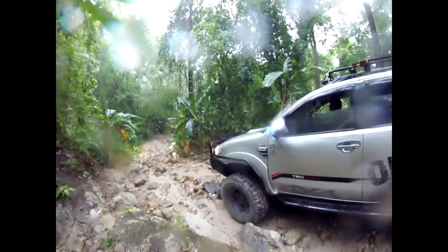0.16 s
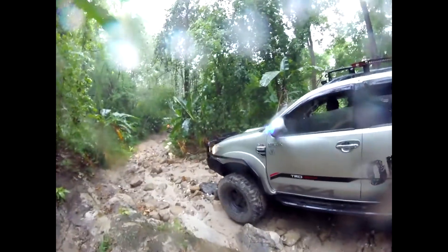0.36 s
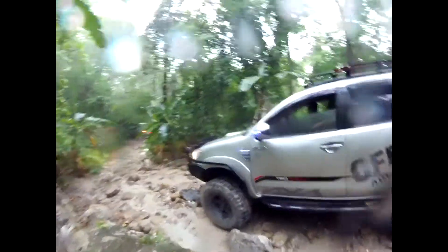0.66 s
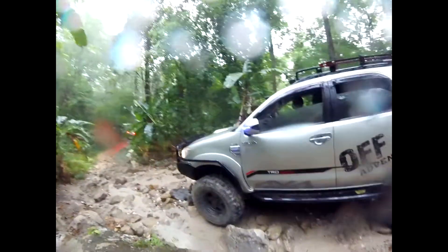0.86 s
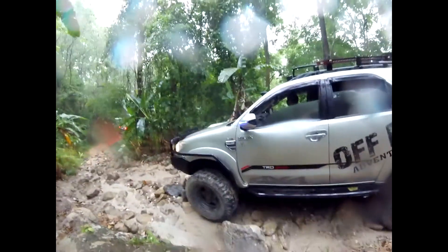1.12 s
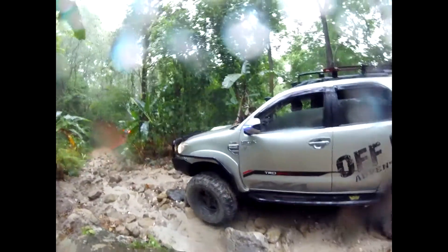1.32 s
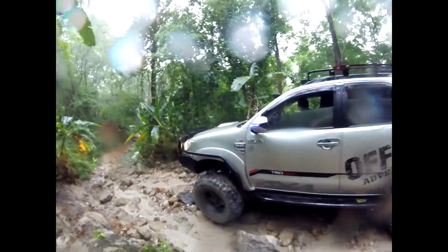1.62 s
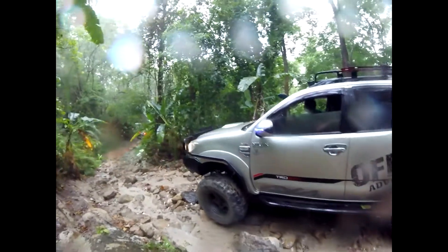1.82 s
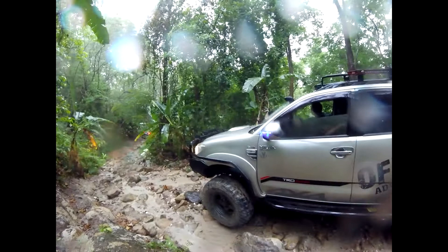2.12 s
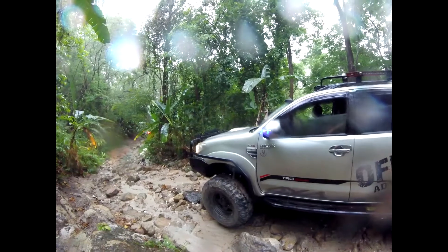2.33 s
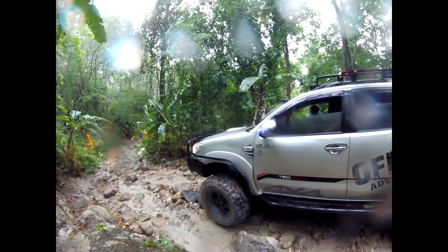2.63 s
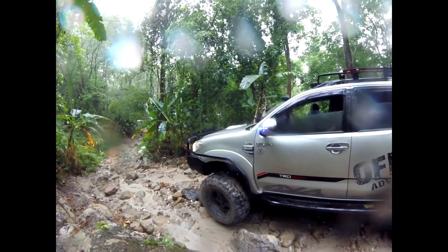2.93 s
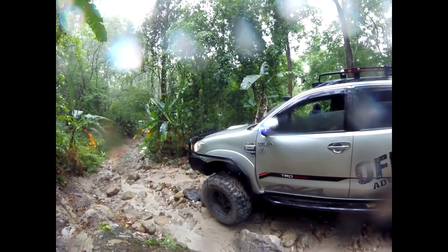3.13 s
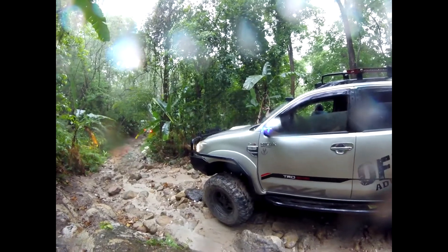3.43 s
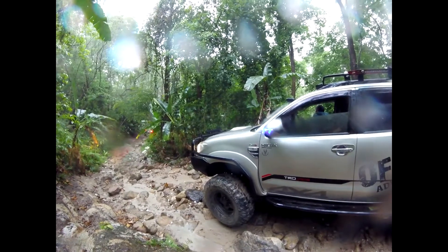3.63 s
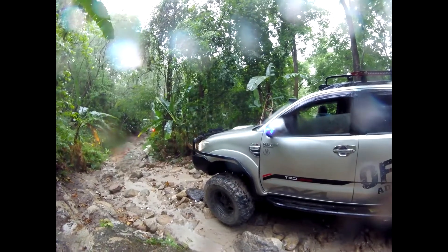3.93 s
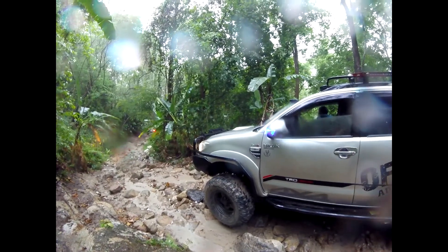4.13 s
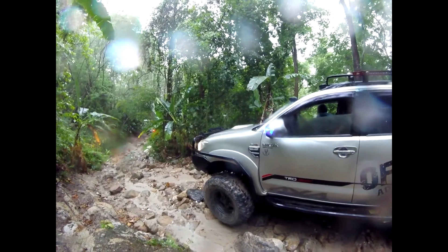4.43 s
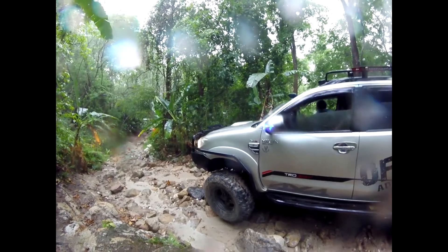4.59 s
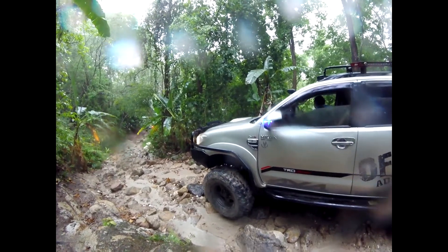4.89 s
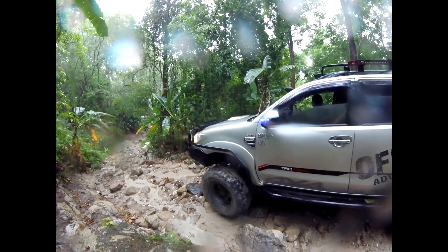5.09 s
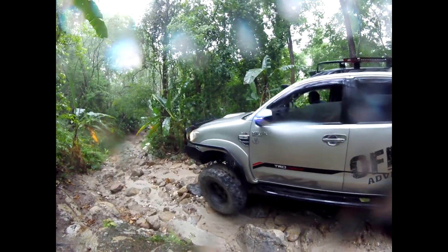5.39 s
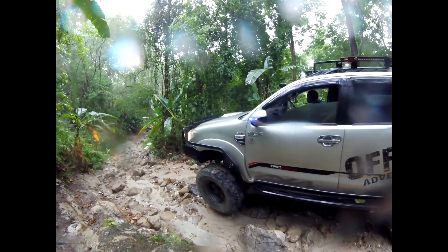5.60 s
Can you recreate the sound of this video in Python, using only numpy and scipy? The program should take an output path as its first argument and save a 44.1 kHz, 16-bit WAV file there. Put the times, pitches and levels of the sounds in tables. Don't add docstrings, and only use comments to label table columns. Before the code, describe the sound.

A diesel four-wheel drive works over wet rocks in forest rain, heard in mono by a small camera close by. From 0 to 1.3 s the low chug, about 25 pulses a second, sits with clear rain hiss, soft low chassis booms and small ticking drops on the case. From 1.3 to 2 s water closes over the microphone and the treble dulls; very faint high brake squeal flickers near 1.7 s and a short creak at 1.86 s. A deep drop thud lands at 1.95 s, the background ducking just before and climbing back. The muffled engine drones on, revving at about 3.4-3.8 s, then sagging. A sharp, hard smack at 3.99 s causes a deeper duck, recovering over more than a second. At about 4.9 s the water film bursts: bright hiss and a faint wet whistle return, and the engine surges with fan rush around 5.35 s, then eases.

```python
import sys
import numpy as np
from scipy import signal
from scipy.fft import rfft, irfft, next_fast_len
from scipy.io import wavfile
from scipy.ndimage import uniform_filter1d, minimum_filter1d, map_coordinates

SR = 44100
rng = np.random.default_rng(int(sys.argv[2]) if len(sys.argv) > 2 else 0)


def generate_wav(signal):
    frames = np.transpose(np.atleast_2d(signal))
    scaled = np.clip(frames, -1, 1) * 32767
    pcm = np.round(scaled).astype(np.int16)
    wavfile.write(sys.argv[1], SR, pcm)


def decibels_to_gain(level_db):
    exponent = np.asarray(level_db, float) / 20
    return 10 ** exponent


N = 253575

# time in seconds, firings per second, share of clean exhaust tone 0-1.
SPEED = [(0, 25, .3), (1.2, 24.7, .3), (2, 24, .45), (3.2, 23.7, .55), (3.45, 28.5, .8), (3.65, 31.5, .8),
         (3.87, 28.5, .8), (4.2, 19, .6), (5.05, 23, .75), (5.35, 33, .86), (5.5, 32, .82), (5.75, 28, .75)]
THUD = 1.95175, -52, [(1123, -18, 0.022), (1700, -12, .012), (2030, -3.5, 0.007), (4360, -29, .003)]
SMACK = 3.9909, -7, [(302, -24.5, 0.033), (1010, -32, 0.023), (1790, -1.5, 0.0096), (2120, -29, .012),
         (2920, -23, 0.0099), (4100, -7, 0.0026), (4780, -8, 0.006)]
OPEN_DB, FILMED_DB = -11.5, -25
FILM_BURST_S = 4.865


def unit(x):
    return x / np.sqrt(np.mean(x ** 2) + 1e-20)


def curves(rows):
    s, *cols = np.transpose(rows)
    return [np.interp(np.arange(N) / SR, s, c) for c in cols]


def wobble(rate):
    knots = rng.standard_normal(int(N * rate / SR) + 4)
    return map_coordinates(knots, [np.arange(N) * rate / SR])


def coloured(x, points, rings=()):
    m = next_fast_len(N + 8192)
    f = np.fft.rfftfreq(m, 1 / SR)
    hz, db = np.transpose(points)
    slope_db = np.interp(np.log(f + 1), np.log(hz + 1), db)
    bumps_db = sum(lift / (1 + (2 * (f - c) / w) ** 2) for c, w, lift in rings)
    return unit(irfft(rfft(x, m) * decibels_to_gain(slope_db + bumps_db), m)[:N])


def patchy(depth_db):
    z = signal.stft(rng.standard_normal(N + 512), nperseg=512)[2]
    field = uniform_filter1d(rng.standard_normal(z.shape), size=6, axis=0)
    field = uniform_filter1d(field, size=10, axis=1)
    return signal.istft(z * decibels_to_gain(depth_db * unit(field)), nperseg=512)[1][:N]


def ring(s, modes, attack):
    out, t = np.zeros(N + SR), np.arange(2000) / SR
    sway = np.zeros(len(t))
    for k, (hz, db, t60) in enumerate(modes):
        sway += (-1) ** k * decibels_to_gain(db - 60 * t / t60) * np.sin(2 * np.pi * hz * t)
    out[round(s * SR):][:len(t)] = sway * (1 - np.exp(-t / attack))
    return out[:N]


def glide(rows, octave=0, waver=0):
    out, t = np.zeros(N), np.arange(N) / SR
    for s, length, hz0, hz1, db in rows:
        u = np.clip((t - s) / length, 0, 1)
        phase = 2 * np.pi * length * u * (hz0 + (hz1 - hz0) * u / 2) + waver
        out += decibels_to_gain(db) * np.abs(np.sin(np.pi * u)) * (np.sin(phase) + octave * np.sin(2 * phase))
    return out


def camera():
    # time in seconds, mid level in dB.
    nearness = [(0, -36.5), (.35, -36), (.65, -35.5), (.85, -34.5), (1.2, -33), (1.6, -37), (1.8, -40.5),
                (1.87, -39), (2, -39), (4.8, -40), (5.0, -38), (5.3, -35), (5.5, -37), (5.75, -41)]
    look_ahead = [
        .0515,
        .0428,
    ]
    # gain after the duck in dB, climb per second as share of full gain.
    ducks = [
        (-12.5, 0.32),
        (-27, 0.61),
    ]
    film_starts_s, film_closing_s, burst_decay_s = 1.28, 0.78, .09
    duck_s = .0012
    brighter = 0.36
    t = np.arange(N) / SR
    gain = np.ones(N)
    for hit, ahead, (duck_db, climb) in zip((THUD[0], SMACK[0]), look_ahead, ducks):
        since = t - hit + ahead
        recovering = np.minimum(1, decibels_to_gain(duck_db) + climb * np.maximum(since - ahead, 0))
        gain = np.where(since > 0, recovering, gain)
    gain = uniform_filter1d(gain, size=round(duck_s * SR) + 1)
    closing = np.clip((t - film_starts_s) / film_closing_s, 0, 1)
    film = closing * np.exp(-np.maximum(t - FILM_BURST_S, 0) / burst_decay_s)
    near_db = curves(nearness)[0]
    clear_db = OPEN_DB + brighter * (near_db - near_db.max() + 2)
    return gain * decibels_to_gain(near_db), clear_db + (FILMED_DB - clear_db) * film


def engine():
    # frequency in Hz, level in dB.
    pipe = [(11, -42), (18, -7.5), (59, 6.5), (114, -5), (162, -14.5), (200, -9.5), (260, -23), (440, -120)]
    # frequency in Hz, level in dB.
    panels = [(65, -30.5), (110, -2.5), (312, -4.5), (455, -18.5), (524, -10.5), (600, -28.5), (780, -43),
              (1320, -120)]
    # time in seconds, exhaust load in dB, body strain in dB.
    load = [(0, 2, -0.5), (.6, 5, 1), (.85, 6.5, 3.5), (1.3, 3, 2), (1.8, 11.5, 4), (2.05, 11.5, 1),
            (2.7, 6, -2), (3.4, 9.5, -1), (3.8, 5, 0), (4.5, 0.5, 1.1), (5.1, 3.5, 1.5), (5.75, 1, -0.5)]
    orders_db = [0, -3.5, -5.5, -15, -12]
    firings_per_s, steady = curves(SPEED)
    exhaust_db, boom_db = curves(load)
    turns = np.cumsum(firings_per_s * (1 + .004 * wobble(12))) / SR
    fired = np.diff(np.floor(turns), prepend=0) > 0
    cylinder_db = np.array([0, -2.5, 1, -1.5])[np.floor(turns).astype(int) % 4]
    pulses = fired * decibels_to_gain(cylinder_db + 0.88 * rng.standard_normal(N))

    tones = np.zeros(N)
    for k, db in enumerate(orders_db, 2):
        level = decibels_to_gain(db + 1.3 * wobble(6))
        tones += level * np.cos(2 * np.pi * k * turns + k * k / 2 + .5 * wobble(9))
    turbulence = decibels_to_gain(2.1 * wobble(14)) * patchy(1.0)
    rumble = 0.23 * coloured(pulses, pipe) + 1.09 * coloured(turbulence, pipe)
    exhaust = steady * unit(tones) + np.sqrt(1 - steady ** 2) * rumble

    shaking = decibels_to_gain(1.46 * wobble(18)) * patchy(0.75)
    boom = .5 * steady ** 2 * coloured(pulses, panels) + 0.95 * coloured(shaking, panels)
    knock = np.exp(-3.5 * (turns % 1)) * decibels_to_gain(4.4 * wobble(22.06))
    return decibels_to_gain(exhaust_db) * exhaust + decibels_to_gain(boom_db - 0.3) * boom, knock


def spatter(rate, spread_db):
    landed = rng.random(N) < rate / SR
    return unit(landed * rng.standard_normal(N) * decibels_to_gain(spread_db * rng.exponential(size=N)))


def rain_and_rattle(treble_db, knock):
    # frequency in Hz, level in dB.
    open_port = [(210, -40.5), (350, -2.5), (750, -2), (1030, -3.5), (1910, -6.5), (3600, -10),
                 (4200, -24.5), (6000, -24), (9600, -24.5), (10050, -46), (11000, -53.5), (11500, -55),
                 (14500, -52.5), (15200, -88)]
    filmed_port = [(210, -42), (350, -7), (600, -2), (1210, -3), (2100, -10), (3780, -26.5), (6000, -37),
                   (11500, -45), (14000, -55.5), (15200, -82)]
    # centre in Hz, width in Hz, lift in dB.
    open_rings = [(534, 22, 3.5), (736, 75, 3.5), (1184, 45, 4), (3090, 1050, 6.5), (5370, 620, 11.5),
                  (6580, 230, 9), (9080, 980, 4.5), (10600, 500, 6.5), (12750, 900, 16)]
    film_rings = [(1040, 61, 2), (1682, 250, 10), (4800, 440, 8)]
    clear = np.sqrt(np.clip(decibels_to_gain(treble_db + 10.5) ** 2 - decibels_to_gain(-16.0) ** 2, 0, 2))
    film = np.sqrt(1 - np.clip(1.134 * clear, 0, .97) ** 2)

    def source():
        hiss = patchy(1.5) * (1 + 0.43 * knock) * decibels_to_gain(0.59 * wobble(7.8))
        return hiss + 0.28 * spatter(2500, spread_db=0.3)

    through_clear = decibels_to_gain(2.5) * clear * coloured(source(), open_port, open_rings)
    through_film = decibels_to_gain(1.0) * film * coloured(source(), filmed_port, film_rings)
    return through_clear + through_film


def fan_rush(treble_db, knock):
    # frequency in Hz, level in dB.
    fan_band = [(1500, -120), (2200, -40), (2750, -3), (3350, 2.5), (3750, -4.5), (4200, -42.5),
                (5500, -120)]
    octaves = np.log2(curves(SPEED)[0] / 32)
    level = decibels_to_gain(-4.5 + 23 * octaves)
    return decibels_to_gain(treble_db - OPEN_DB) ** 2 * level * (1 + .3 * knock) * coloured(patchy(2.2), fan_band)


def chassis_lurches():
    # start in seconds, length in seconds, pitch in Hz, level in dB.
    lurches = [(0.063, 0.061, 52, -23.5), (0.428, .08, 67, -19.5), (0.599, .06, 60.6, -23),
               (.86, 0.11, 44, -23.5), (1.03, 0.031, 50, -14.5), (1.066, 0.052, 56, -12),
               (1.142, 0.054, 52.5, -15.5), (1.321, 0.068, 58, -19.5), (1.423, 0.059, 65, -22),
               (1.671, 0.078, 69.7, -25.5), (1.781, .05, 40, -24.5), (1.834, 0.048, 62.6, -23.5)]
    sag = 0.91
    return glide([(s, length, hz, hz * sag, db) for s, length, hz, db in lurches])


def small_drops():
    # time in seconds, peak in dB, ring in Hz, case body in dB, bright crack in dB.
    ticks = [(0.116, -19.5, 1700, -11, -21), (0.129, -18.5, 3130, -11, -10.5),
             (0.3955, -17.5, 2050, -7, -20), (0.7042, -11.5, 1700, -25, -36), (0.8614, -40, 3320, -6, -17),
             (0.9297, -15, 1360, -24, -36), (1.072, -12, 3220, -14, -20), (1.3787, -23, 3240, -10, -24),
             (1.494, -23, 1570, -9, -14.5), (1.592, -21, 1550, -26, -40), (1.7, -33, 1740, -15, -15),
             (1.8424, -36, 1800, -18, -13), (2.401, -20.5, 1770, -36, -46), (3.6928, -21.5, 1770, -12, -34),
             (4.0644, -52, 1650, -24, -20), (4.228, -27, 1750, -14.5, -45), (4.5394, -52, 1640, -16, -31),
             (5.083, -20.5, 1680, -26, -36), (5.1862, -13, 1640, -25, -33), (5.3114, -26, 3360, -18, -11)]
    out = np.zeros(N)
    for s, db, hz, body_db, crack_db in ticks:
        main = [(hz, db - 4.5, .011), (.68 * hz, db - 12, .008)]
        body = [(pitch, db + body_db - 0.5, .005) for pitch in (2340, 2950, 4070, 4800)]
        crack = [(pitch, db + crack_db + 7.5, .006) for pitch in (5450, 6500)]
        out += ring(s, main + body + crack, attack=.0004)
    return out


def brake_squeal():
    # start in seconds, length in seconds, start in Hz, end in Hz, level in dB.
    slips = [
        (1.617, .03, 4470, 4620, -56),
        (1.649, .012, 4620, 4520, -58),
        (1.657, .05, 4490, 4445, -56),
        (1.712, .055, 4430, 4540, -54),
        (1.762, .03, 4530, 4530, -68),
    ]
    waver = 2 * np.pi * np.cumsum(12 * wobble(90)) / SR
    return decibels_to_gain(1.5 * wobble(60)) * glide(slips, octave=1, waver=waver)


def creaks():
    # start in seconds, length in seconds, start in Hz, end in Hz, level in dB.
    creak_rows = [
        (1.858, .033, 1680, 1950, -33),
        (1.86, .025, 1350, 1340, -36),
        (1.643, .016, 4900, 5000, -53),
        (4.0, .05, 5250, 5250, -76),
    ]
    return glide(creak_rows)


def big_drops():
    push = 1.95135, [(250, 8.5, .0135), (560, -3, .006)], .002
    out = ring(*push)
    for (s, crack_db, modes), attack in ((THUD, .0004), (SMACK, .00006)):
        crack = [(6120, crack_db, 0.0013), (9100, crack_db - 10.5, 0.0014),
                 (10800, crack_db - 28, 0.0052), (14000, crack_db - 26.5, 0.0022)]
        out += ring(s, modes + crack, attack)
    return out


def rim_whistle(treble_db):
    # frequency in Hz, level in dB.
    rim_band = [(4500, -120), (6500, -30), (7600, -5), (8900, 1), (9700, -3), (10100, -40), (10600, -120)]
    opened = np.arange(N) / SR > FILM_BURST_S
    return decibels_to_gain(treble_db - OPEN_DB) * decibels_to_gain(-22) * opened * coloured(patchy(1.5), rim_band)


def thinned(x, from_hz, under_db, dip):
    hz, _, z = signal.stft(x, SR, nperseg=2048)
    power = np.abs(uniform_filter1d(np.abs(z) ** 2, size=12, axis=-2))
    usual = np.abs(uniform_filter1d(power, size=7, axis=-1))
    usual = minimum_filter1d(usual, size=5, axis=-1)
    mids = usual[..., (hz > 500) & (hz < 2000), :].mean(axis=-2, keepdims=True)
    quiet = usual < mids * decibels_to_gain(under_db) ** 2
    faint = (hz[:, None] > from_hz) & quiet & (power < dip * usual)
    return signal.istft(z * np.where(faint, .05, 1), SR, nperseg=2048)[1][..., :N]


def scene():
    gain, treble_db = camera()
    motor, knock = engine()
    steady = motor + rain_and_rattle(treble_db, knock)
    steady = steady + fan_rush(treble_db, knock) + rim_whistle(treble_db)
    sudden = chassis_lurches() + small_drops() + brake_squeal() + creaks() + big_drops()
    return (gain * steady + sudden)[None]


def top_cut(x):
    return signal.sosfilt(signal.butter(12, 16230, fs=SR, output="sos"), x)


def record(dry):
    # frequency in Hz, level in dB.
    hiss_slope = [(1500, -30.5), (4000, -8), (7000, -4), (12000, -6), (14000, -43)]
    hiss = decibels_to_gain(-90.0) * coloured(rng.standard_normal(N), hiss_slope)
    mix = thinned(dry + hiss, from_hz=6500, under_db=-36, dip=.72)
    return top_cut(mix)


dry = scene()
out = record(dry)
generate_wav(out)
```